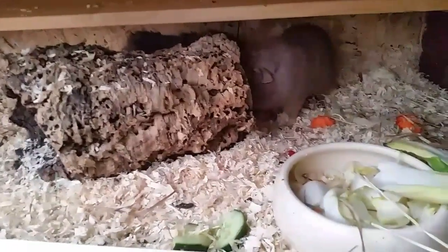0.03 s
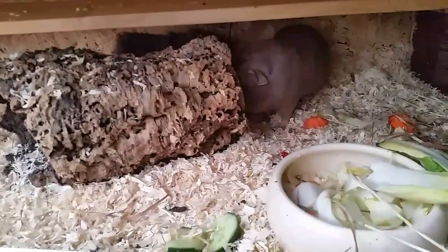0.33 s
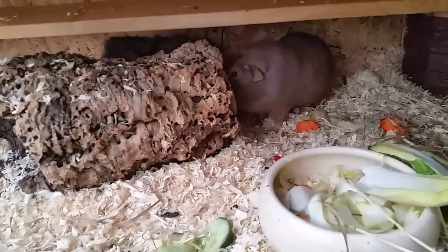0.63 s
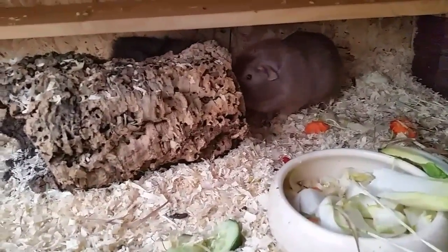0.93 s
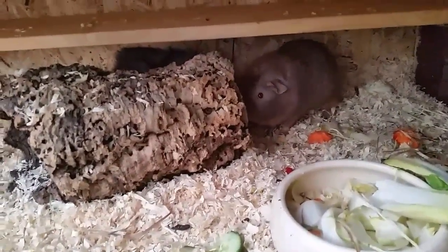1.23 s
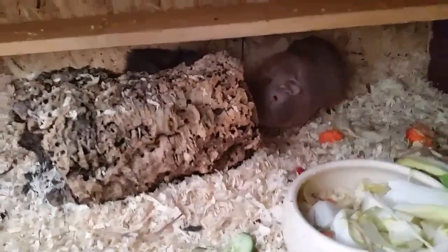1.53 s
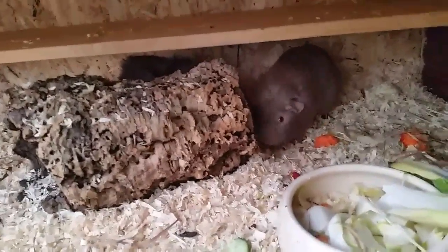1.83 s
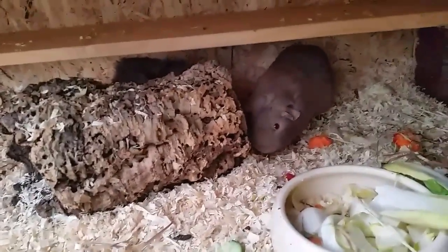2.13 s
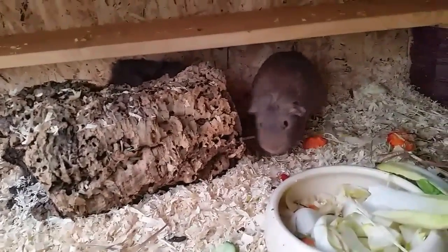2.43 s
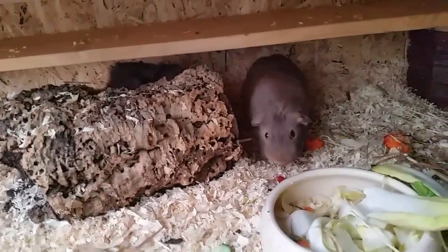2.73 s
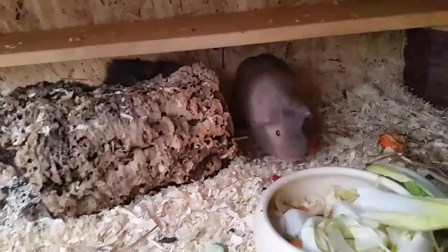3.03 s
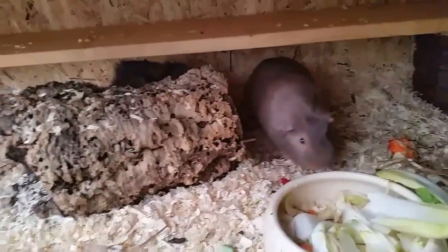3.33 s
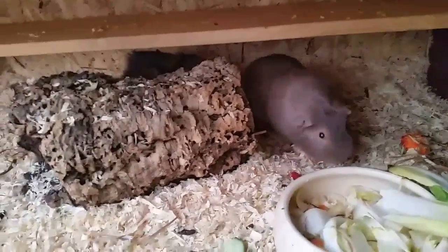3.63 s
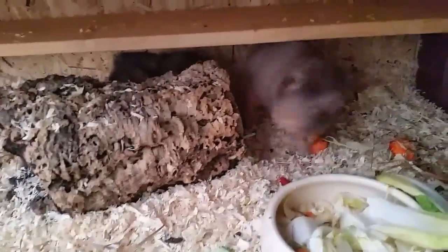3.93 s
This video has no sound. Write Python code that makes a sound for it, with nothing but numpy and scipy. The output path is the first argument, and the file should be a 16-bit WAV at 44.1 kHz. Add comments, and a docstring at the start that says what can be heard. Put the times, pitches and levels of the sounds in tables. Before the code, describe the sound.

Quiet guinea pig purring comes in two brief runs, then a longer one, in an indoor hutch. Tiny squeaks and soft bedding rustles accompany it, with dull handling thumps on the microphone and a constant rumble and hiss.

```python
"""Low room rumble and steady hiss, a dull bump, and at once a guinea pig purring in a wooden hutch.
The purr comes in runs of short low grunts, about fifteen a second, each a sagging tone with a rasp of air.
Faint squeaks glide on top, and late on a thin whimper. Wood shavings rustle and scuff as the animal
turns round. Fingers bump and rub the hand-held microphone, mostly on its left side."""
import sys
import numpy as np
from scipy import signal
from scipy.fft import rfft, irfft
from scipy.io import wavfile

SR = 44100
rng = np.random.default_rng(int(sys.argv[2]) if len(sys.argv) > 2 else 0)


def inscribe(sig):
    """Save sig as 16-bit PCM at rate SR to the path in sys.argv[1].

    A 1-D sig is mono; a 2-D sig holds one channel per row.
    Samples are clipped to [-1, 1] before scaling.
    """
    pcm = np.round(np.clip(np.atleast_2d(sig).T, -1, 1) * 32767)
    wavfile.write(sys.argv[1], SR, pcm.astype(np.int16))


N = 176400
TIME = np.arange(N) / SR

# tone of the room rumble: f/Hz, relative level/dB
RUMBLE_COLOUR = [(15,-27),(30,-18),(45,13),(56,2),(70,2),(95,-4.5),(130,-13),(180,-16.5),(250,-16.5),(400,-75.5)]
# swells and dips of the rumble: t/s, level/dB
RUMBLE_SWELLS = [(0,-42),(.1,-43),(.18,-51),(.29,-42),(.4,-47),(.53,-41),(.6,-53),(.66,-42),(.75,-42),(.82,-49),(.95,-44),(1.35,-43),(1.45,-51),(1.53,-45),(1.66,-50),(1.8,-44),(2.1,-47),(2.4,-46),(2.82,-51),(2.97,-43),(3.28,-51),(3.45,-46),(4,-45)]
# tone of the room's steady air: f/Hz, relative level/dB
AIR_COLOUR = [(100,-6),(185,-5),(250,1),(320,-0.5),(500,-10),(1000,-22.5),(2000,-70)]
# tone of the hiss on each side: f/Hz, relative left level/dB, relative right level/dB
HISS_COLOUR = [(20.2,-86.5,-95),(92,-73.5,-87),(182,-83.5,-82.5),(315,-86.5,-94.5),(502,-82.5,-94.5),(810,-86,-95),(1166,-92,-101),(1620,-99,-106),(1945,-109.5,-110),(2603,-96.5,-106),(2943,-86.5,-103),(3275,-83.5,-102),(3885,-84.5,-103),(4580,-96,-108),(5030,-119,-118),(6060,-133,-126),(8750,-134,-135),(10240,-126,-129),(11600,-116,-121),(15400,-113,-113.5)]
# bumps on the microphone: t/s, left peak level/dB, f/Hz, half length/s
MIC_BUMPS = [(.06,-28.5,73,0.011),(1.085,-37.5,82,0.022),(1.182,-36.5,92,0.015),(1.351,-28.5,74,0.0084),(1.722,-35,280,0.0042),(1.932,-28,263,0.0021),(1.935,-32.5,82,0.011),(2.362,-28,80,0.005),(2.87,-27.5,81,0.0057),(3.405,-30,94,0.015),(3.672,-25,113,0.0064),(3.879,-30,102,0.018)]
# grunts of the purr: t/s, voice level/dB, rasp level/dB
PURR_GRUNTS = [(0.065,-47,-61),(0.126,-59,-61.5),(0.182,-51.5,-54),(.248,-60,-58),(0.316,-51.5,-53),(0.383,-47.5,-50.5),(0.452,-49,-53.5),
               (1.134,-50.5,-56.5),(1.204,-67,-59),(1.257,-47,-55),(1.321,-49,-59),(2.197,-49.5,-57),(2.246,-42.5,-54.5),(2.307,-46.5,-56),(2.368,-41,-57.5),(2.428,-43.5,-56.5),(2.497,-43,-49.5),
               (2.571,-50,-51.5),(2.647,-47,-55),(2.719,-52,-52.5),(2.778,-45,-56),(2.843,-44,-56.5),(2.905,-40.5,-49),(2.974,-42,-52.5),(3.044,-41,-53),(3.11,-44,-50),(3.18,-43,-50.5),
               (3.253,-52,-59.5),(3.322,-44.5,-53),(3.391,-46,-56),(3.46,-46.5,-50),(3.539,-49.5,-53.5),(3.618,-57,-52.5)]
# throat tone of the rasp: f/Hz, relative level/dB
THROAT_COLOUR = [(200,-45),(330,5),(480,6),(650,-2.5),(800,-13),(980,-4.5),(1300,-16.5),(1700,-19),(3000,-70)]
# squeaks: t/s, length/s, start f/Hz, end f/Hz, level/dB
SQUEAK_GLIDES = [(0.281,0.021,1007,886,-51),(0.294,0.041,1000,876,-56),(.442,0.0278,319.2,684,-50),(0.463,0.042,843,1000,-60),(.495,.035,1120,1454,-64.5),(0.928,0.019,727,580,-51.5),(.99,0.039,835,878,-56.5),
                 (1.682,0.017,947,1054,-57),(2.485,0.012,958,860,-51),(2.602,0.019,410,520,-47.5),(2.79,0.022,650,820,-56),(2.89,0.05,975,984,-61),(3.668,0.022,1173,1134,-50.5),(3.743,0.028,1177,1290,-60.5)]
# fingers rubbing beside the microphone: t/s, length/s, left level/dB
FINGER_RUBS = [(.47,0.089,-46.5),(0.697,0.051,-46.5),(1.43,0.17,-45),(1.817,0.18,-43),(3.366,.24,-39.5),(3.6,0.12,-41),(3.771,.27,-39)]
# tone of the rubbing: f/Hz, relative level/dB
FINGER_COLOUR = [(30,-58),(60,2.5),(85,-5),(110,4),(150,-5.5),(250,-18),(500,-25.5),(1000,-40),(2000,-86.5)]
# steps in the shavings: peak t/s, attack/s, decay/s, rustle level/dB, scuff level/dB
PAW_STEPS = [(.855,0.029,0.087,-67,-56.5),(1.0,.09,0.3,-78,-62),(1.345,0.075,0.07,-69,-65),(1.52,0.058,.06,-78,-70),(1.723,0.0062,.008,-69,-60),(1.96,0.033,0.11,-77,-62),
             (2.2,0.061,0.044,-95,-63.5),(2.52,0.11,.2,-75,-62),(2.9,0.068,0.071,-80,-61),(3.01,.02,0.036,-67,-72),(3.11,0.05,0.18,-71.5,-65),(3.63,0.094,0.48,-73.5,-57.5),(3.9,0.031,0.051,-68,-60.5),(3.98,.05,.15,-68,-60)]
# crisp top of a step: f/Hz, relative level/dB
RUSTLE_COLOUR = [(3000,-19),(5500,-27),(9000,-23),(10500,-12),(12000,0),(14000,8.5),(16000,0.5)]
# dull body of a step: f/Hz, relative level/dB
PAW_SCUFF_COLOUR = [(100,-20),(250,-2),(500,0),(950,-8),(1400,-14),(2000,-23.5),(4000,-78)]
# contour of the whimper's fundamental: t/s, f/Hz, level/dB
WHIMPER_CONTOUR = [(2.98,1300,-85),(3.08,1400,-73),(3.17,1400,-74),(3.25,1390,-72),(3.32,1520,-70),(3.41,1380,-69),(3.47,1470,-67),(3.56,1350,-85)]


def from_db(db):
    """Decibels to gain."""
    return 10 ** (np.asarray(db) / 20)


def unit_rms(x):
    """Scale to unit rms."""
    return x / np.sqrt(np.mean(x ** 2) + 1e-20)


def pan(db):
    """Left and right gains; positive leans left."""
    return from_db([[db], [-db]])


def noise(colour, channels=1):
    """Unit noise shaped by (f/Hz, level/dB) points, unrelated between channels."""
    hz, db = np.transpose(colour)
    bins = np.maximum(np.arange(N // 2 + 1) * SR / N, 1)
    shape = from_db(np.interp(np.log(bins), np.log(hz), db))
    return unit_rms(irfft(rfft(rng.standard_normal((channels, N))) * shape, N))


def drift(hz):
    """Smooth random wander of spread 1, mostly slower than hz."""
    bins = np.arange(N // 2 + 1) * SR / N
    return unit_rms(irfft(rfft(rng.standard_normal(N)) / (1 + (bins / hz) ** 2), N))


def swell(peak_s, attack_s, decay_s):
    """A rounded rise to a peak, then an exponential fall."""
    t = TIME - peak_s
    return np.exp(-(np.minimum(t, 0) / attack_s) ** 2 - np.maximum(t, 0) / decay_s)


def gate(start_s, length_s, edge_s):
    """Opens for a length of time, with soft edges."""
    t = TIME - start_s
    return (np.tanh(2 * t / edge_s) - np.tanh(2 * (t - length_s) / edge_s)) / 2


def phase_of(hz):
    """Running phase of a changing pitch."""
    return 2 * np.pi * np.cumsum(hz) / SR


def room_tone(air_db=-59.5, left_hiss_db=-49, right_hiss_db=-59):
    """The bed: swelling rumble and steady air in the centre, with a separate hiss on each side."""
    hiss_colour = np.array(HISS_COLOUR)
    left_hiss = from_db(left_hiss_db) * noise(hiss_colour[:, [0, 1]])
    right_hiss = from_db(right_hiss_db) * noise(hiss_colour[:, [0, 2]])
    rumble = from_db(np.interp(TIME, *np.transpose(RUMBLE_SWELLS))) * noise(RUMBLE_COLOUR)
    air = from_db(air_db) * noise(AIR_COLOUR)
    return rumble + air + np.vstack([left_hiss, right_hiss])


def mic_bumps():
    """The hand nudges the microphone: soft, dull thumps only a few cycles long."""
    bumps = np.zeros(N)
    for at, db, hz, half_length in MIC_BUMPS:
        t = TIME - at
        bumps -= from_db(db) * np.exp(-(t / half_length) ** 2) * np.cos(2 * np.pi * hz * t)
    return bumps


def purr(pitch_hz=238.2, pitch_spread=0.054, sag_hz_per_s=150, rough_db=2):
    """Each grunt is a few rough, sagging cycles of voice, with a rasp of air let through once a cycle."""
    voice, breath = np.zeros(N), np.zeros(N)
    for at, voice_db, rasp_db in PURR_GRUNTS:
        t = TIME - at
        detune, phase_offset = rng.standard_normal(2)
        hz = pitch_hz * (1 + pitch_spread * detune)
        phase = 2 * np.pi * (hz * t - sag_hz_per_s * t * t / 2 + phase_offset)
        voice += from_db(voice_db) * swell(at, attack_s=.0075, decay_s=.015) * np.sin(phase)
        puff = swell(at - .002, attack_s=.005, decay_s=.01)  # the air peaks just ahead of the voice
        breath += from_db(rasp_db) * puff * (1 + np.cos(phase))
    roughness = from_db(rough_db * drift(hz=150))
    rasp = breath * noise(THROAT_COLOUR)
    return (voice * roughness + rasp) * pan(db=0.2)


def hutch(sound, t60_s=0.072, wet_db=-7):
    """Adds the short diffuse ring between the wooden walls."""
    t = TIME[:SR // 2]
    tail = rng.standard_normal((2, len(t))) * from_db(-60 * t / t60_s)
    tail /= np.sqrt(np.sum(tail ** 2, axis=1, keepdims=True))
    return sound + from_db(wet_db) * signal.fftconvolve(sound, tail, axes=1)[:, :N]


def squeaks(waver):
    """Tiny calls: pure tones that waver as they glide up or down."""
    calls = np.zeros(N)
    for at, length, start_hz, end_hz, db in SQUEAK_GLIDES:
        hz = np.interp(TIME, [at, at + length], [start_hz, end_hz]) * waver
        calls += from_db(db) * gate(at, length, edge_s=length / 2) * np.sin(phase_of(hz))
    return calls


def finger_rubs():
    """Fingers slide beside the microphone: short stretches of low friction noise."""
    envelope = sum(from_db(db) * gate(at, length, edge_s=0.013) for at, length, db in FINGER_RUBS)
    return envelope * noise(FINGER_COLOUR)


def shavings(grain_db=1.2):
    """Shavings shift under the paws: a fine crisp rustle over a dull scuff; steps add in power."""
    rustle_power, scuff_power = np.zeros(N), np.zeros(N)
    for at, attack, decay, rustle_db, scuff_db in PAW_STEPS:
        step = swell(at, attack, decay)
        rustle_power += (from_db(rustle_db) * step) ** 2
        scuff_power += (from_db(scuff_db) * step) ** 2
    grain = from_db(grain_db * drift(hz=120))
    mid, side = noise(PAW_SCUFF_COLOUR, channels=2)
    scuff = np.sqrt(scuff_power) * np.vstack([mid + side, mid - side]) * pan(db=0.4)
    rustle = np.sqrt(rustle_power) * noise(RUSTLE_COLOUR, channels=2) * pan(db=3)
    return grain * (rustle + scuff)


def whimper(waver, octave_db=-4, flutter_db=4):
    """One thin held call with its octave, fluttering in level."""
    times, hz, db = np.transpose(WHIMPER_CONTOUR)
    phase = phase_of(np.interp(TIME, times, hz) * waver)
    tone = np.sin(phase) + from_db(octave_db) * np.sin(2 * phase)
    level = from_db(np.interp(TIME, times, db) + flutter_db * drift(hz=25))
    return level * gate(times[0], times[-1] - times[0], edge_s=.02) * tone


def scene(waver_depth=0.0241, handling_right_db=-16):
    """The mix: the voice ringing in the hutch, with dry shavings, handling noise and room tone."""
    grunts = purr()
    waver = 1 + waver_depth * drift(hz=71)  # pitch tremble of the high calls
    calls = (squeaks(waver) + whimper(waver)) * pan(db=1.5)
    animal = hutch(grunts + calls) + shavings()
    handling = (mic_bumps() + finger_rubs()) * from_db([[0], [handling_right_db]])
    return animal + handling + room_tone()


def record(dry, fade_s=.003, cutoff_hz=15900):
    """A quick fade at each end and a steep cut of the very top."""
    faded = dry * gate(fade_s, N / SR - 2 * fade_s, edge_s=fade_s)
    lowpass = signal.ellip(12, .1, 70, cutoff_hz, fs=SR, output="sos")
    return signal.sosfilt(lowpass, faded)


dry = scene()
out = record(dry)
inscribe(out)
```